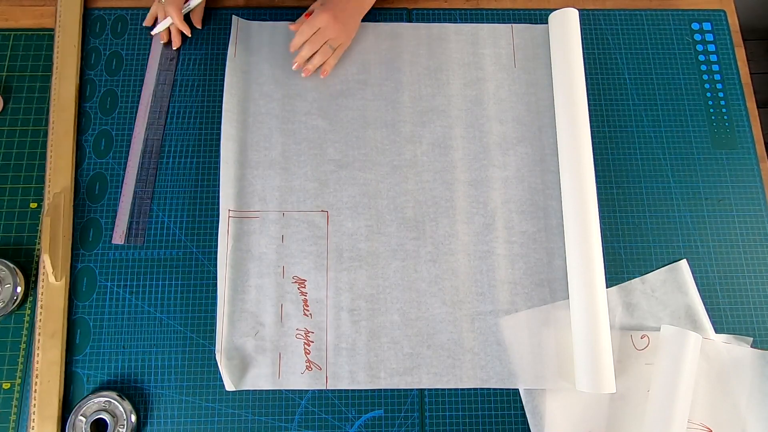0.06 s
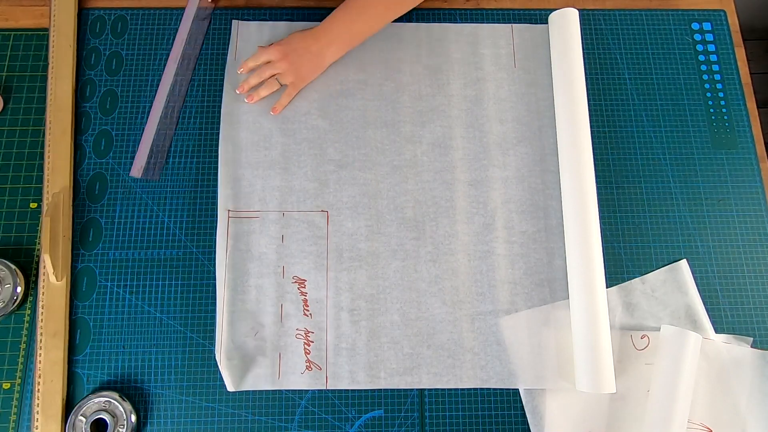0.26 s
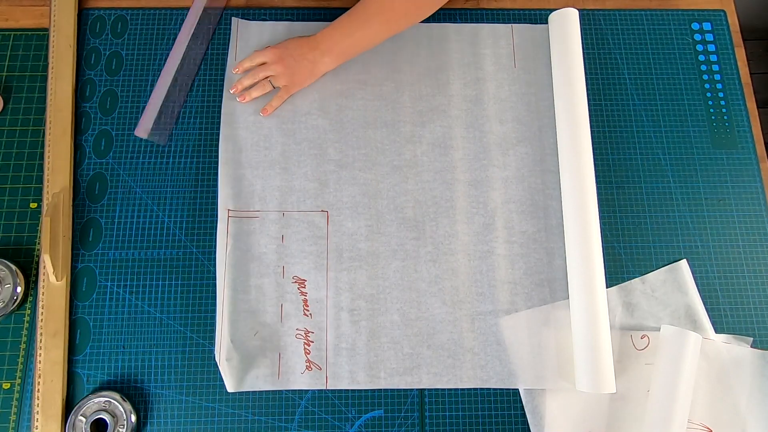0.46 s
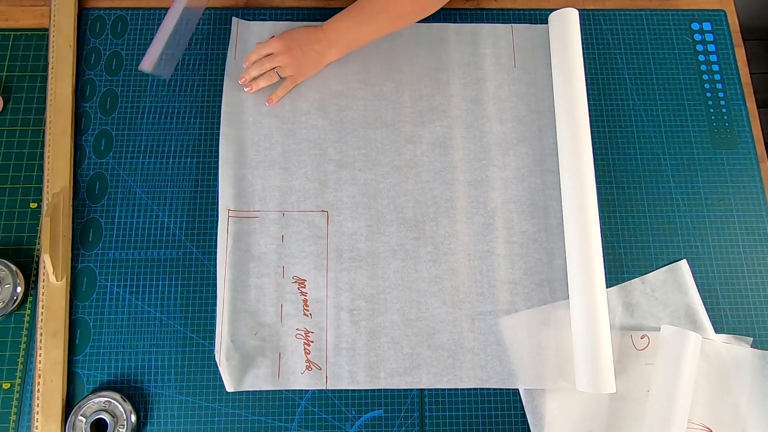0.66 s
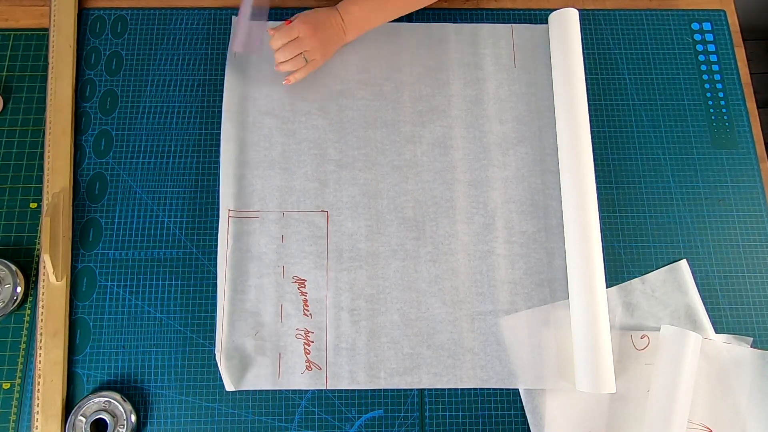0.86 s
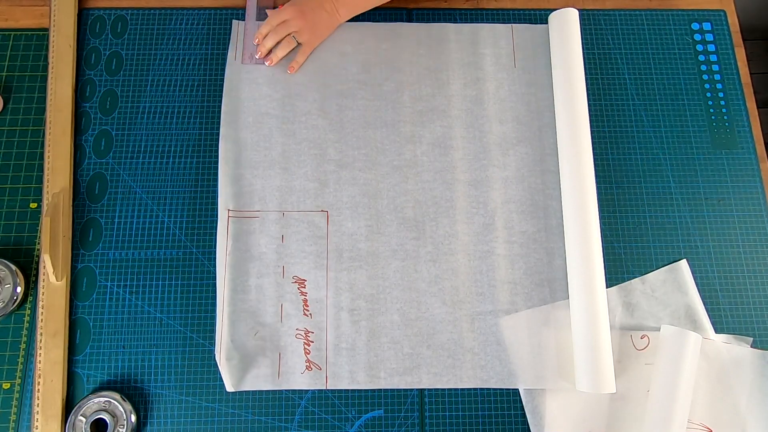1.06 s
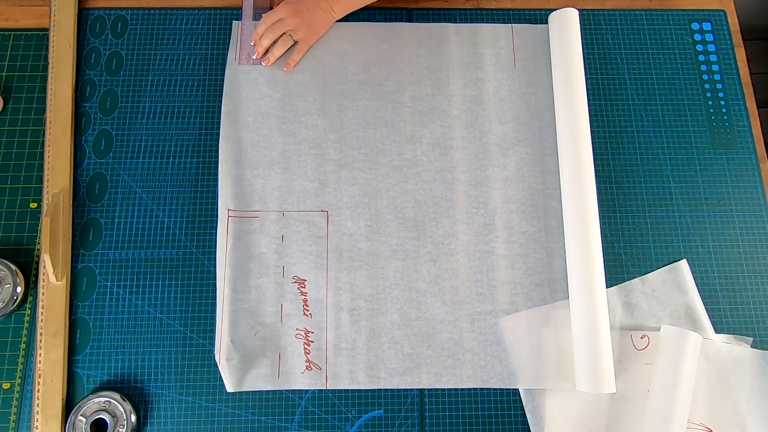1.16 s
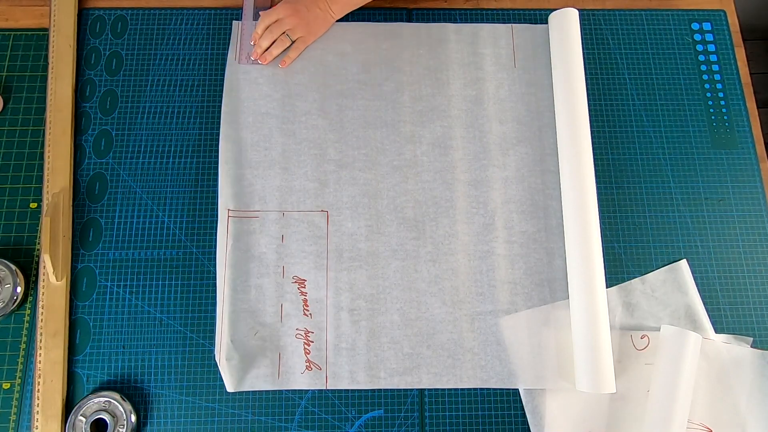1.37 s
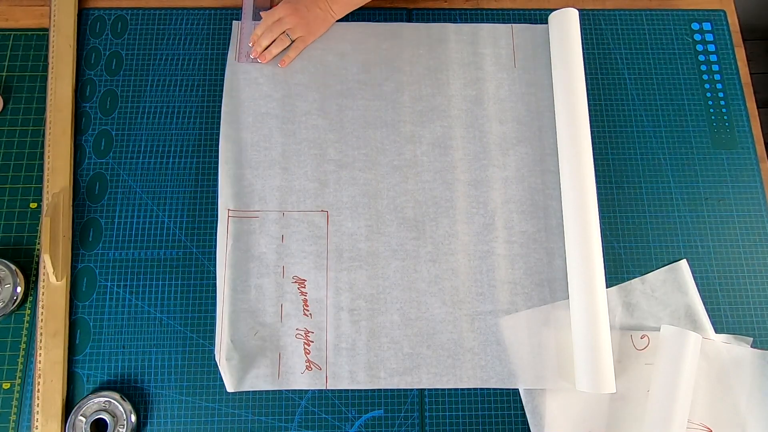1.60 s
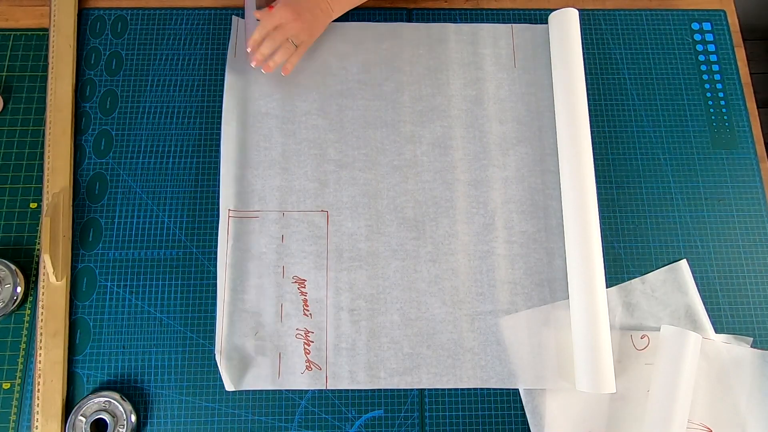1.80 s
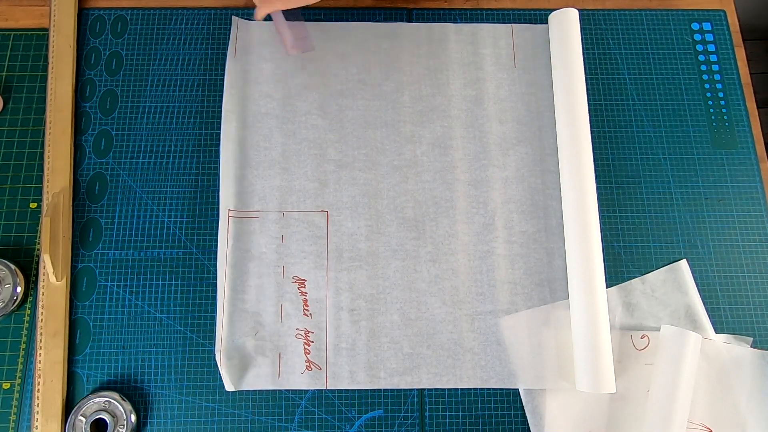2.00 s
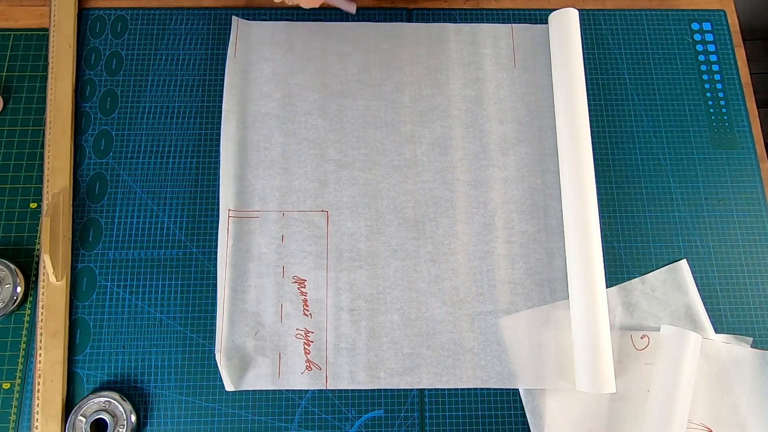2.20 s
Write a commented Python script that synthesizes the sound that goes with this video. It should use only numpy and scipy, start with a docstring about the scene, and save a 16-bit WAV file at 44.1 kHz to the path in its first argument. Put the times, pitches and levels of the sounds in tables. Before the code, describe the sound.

A plastic ruler drags and clacks down on paper over a mat after a hard table knock

```python
"""Ruler and knock at a work table

A hard knock on a work table makes the table top rattle and ring in a small room. A plastic ruler drags
off a cutting mat as grains of friction noise, squeaks, and clicks down on paper with chattering contacts.
Low coloured noise is the knock's dying rumble at first, then hands and sleeves. A quiet room tone, which
is steady coloured noise, lies under it all."""
import sys
import numpy as np
from scipy import signal
from scipy.fft import rfft, irfft
from scipy.io import wavfile

SR = 44100
rng = np.random.default_rng(int(sys.argv[2]) if len(sys.argv) > 2 else 0)


def to_wav(sig):
    """Store sig (one row per channel, or 1-D mono) as 16-bit WAV at the path in sys.argv[1].

    Samples outside -1..1 are clipped; the rate is SR.
    """
    pcm = np.clip(np.atleast_2d(sig), -1, 1) * 32767
    pcm = np.round(pcm).astype(np.int16)
    wavfile.write(sys.argv[1], SR, pcm.T)  # frames by channels


N = 99180


def from_db(db):
    """Turn decibels into a gain."""
    return 10 ** (np.asarray(db) / 20)


def rms_one(x):
    """Scale a signal to an average (RMS) strength of 1."""
    return x / np.sqrt(np.mean(x ** 2) + 1e-20)


def in_time(rows):
    """Join each level column by straight lines in dB, as gains; -120 dB outside the table."""
    times, *columns = np.transpose(rows)
    now = np.arange(N) / SR
    return [from_db(np.interp(now, times, levels, left=-120, right=-120)) for levels in columns]


def at_hz(points, hz, column=1):
    """Read a table column at any frequency, along a logarithmic frequency scale."""
    points = np.array(points)
    return np.interp(np.log(hz), np.log(points[:, 0]), points[:, column])


def colour(x, spectrum):
    """Shape a signal by a table of level over frequency."""
    hz = np.fft.rfftfreq(len(x), 1 / SR) + 1   # +1 avoids the logarithm of zero
    return irfft(rfft(x) * from_db(at_hz(spectrum, hz)), len(x))


def drift(rate_hz):
    """Slow random wandering of RMS 1: noise smoothed twice, made at every 40th sample."""
    r = np.exp(-80 * np.pi * rate_hz / SR)
    noise = rng.standard_normal(N // 40 + 2002)
    slow = signal.lfilter([1], [1, -2 * r, r * r], noise)[2000:]   # skip the filter's start
    return np.interp(np.arange(N) / 40, np.arange(len(slow)), rms_one(slow))


def ring(x, hz, t60):
    """A unit click sets off a sine of starting height 1 that falls 60 dB in t60 seconds."""
    r = from_db(-60 / (t60 * SR))
    w = 2 * np.pi * hz / SR
    return signal.lfilter([0, np.sin(w)], [1, -2 * r * np.cos(w), r * r], x + 1e-18)


def peak(x, hz, width_hz):
    """A resonance that lets its own frequency through with a gain of about 1."""
    r = np.exp(-np.pi * width_hz / SR)
    poles = [1, -2 * r * np.cos(2 * np.pi * hz / SR), r * r]
    return signal.lfilter(np.array([1, 0, -1]) * (1 - r * r) / 2, poles, x)


def add(out, s, piece):
    """Mix a piece in at a time in seconds."""
    i = int(s * SR)
    out[i:i + len(piece)] += piece[:N - i]


def body(clicks, modes, damping):
    """All modes of one object ring together, with alternating signs."""
    out = 0
    for k, (hz, db, t60) in enumerate(modes):
        ring_s = np.clip(t60, .02, .4) * damping
        out = out + from_db(db) * ring(clicks, hz, ring_s) * (-1) ** k
    return out


# Colour of the quiet room: f/Hz, relative level/dB per Hz
ROOM_TONE_COLOUR = [(12, -19.5), (20, 15.5), (32, -18), (113, -2), (222, -11.5), (399, -15.5), (459, -16.5),
                    (976, -17.5), (1660, -27.5), (1910, -26.5), (16000, -32)]
ROOM_TONE_DB = -60


def room_tone():
    """Steady noise, coloured like the quiet room."""
    return from_db(ROOM_TONE_DB) * rms_one(colour(rng.standard_normal(N), ROOM_TONE_COLOUR))


# The knock's dying rumble at first, then hands and sleeves; before the flicker: t/s, level/dB
RUMBLE_AND_RUSTLE_LEVELS = [(0, -28), (.1, -45), (.2, -45.5), (.3, -51.5), (.4, -51), (.46, -47),
                            (.53, -60), (.6, -54.5), (.7, -65.5), (.8, -59), (.95, -61), (1.1, -66.5),
                            (1.3, -69), (1.55, -82), (1.7, -70), (1.78, -59.5), (1.9, -57), (2.0, -62),
                            (2.07, -58.5), (2.12, -62.5), (2.19, -56), (2.25, -72.5)]
# Colour of both: f/Hz, relative level/dB per Hz
RUMBLE_AND_RUSTLE_COLOUR = [(24, -37.5), (40, -12), (60, -2.5), (81, -16.5), (169, -5), (203, -8), (271, 0),
                            (331, -7.5), (727, -9.5), (846, -5.5), (1520, -18.5), (2200, -19),
                            (2860, -25.5), (4840, -120)]


def rumble_and_rustle():
    """Low coloured noise with a flickering level: the knock's dying rumble at first, then hands and sleeves."""
    low_noise = rms_one(colour(rng.standard_normal(N), RUMBLE_AND_RUSTLE_COLOUR))
    flicker = from_db(2.0 * drift(23.2))   # typical swing 2 dB
    return in_time(RUMBLE_AND_RUSTLE_LEVELS)[0] * flicker * low_noise


LOW_TONE_HZ, LOW_TONE_WIDTH_HZ = 2000, 750
GRAINS_PER_S, GRAIN_SPREAD_DB = 10000, 4.5
# Three stretches of dragging over mat and paper, before the flicker:
# t/s, level of the hiss/dB, level of its lower tone/dB
DRAG_LEVELS = [
    [(.17, -64.5, -83), (.25, -44, -56), (.31, -36.5, -59.5), (.36, -39, -40), (.40, -43, -68.5),
     (.46, -46, -65), (.51, -51.5, -61), (.535, -56.5, -87), (.555, -46.5, -60), (.58, -44.5, -47),
     (.60, -62.5, -62), (.635, -54.5, -74.5), (.65, -45.5, -59), (.672, -49, -56), (.69, -61, -64),
     (.75, -63.5, -68), (.775, -56, -64), (.83, -59.5, -68), (.86, -67.5, -77), (.95, -69, -69)],
    [(1.05, -60, -80), (1.14, -43.5, -86), (1.19, -52, -82), (1.27, -65.5, -108), (1.36, -68, -71),
     (1.45, -93, -85.5)],
    [(1.6, -85, -87), (1.63, -73, -98), (1.7, -80, -109), (1.76, -78, -91), (1.78, -66, -88),
     (1.84, -64.5, -68), (1.9, -65.5, -83), (1.96, -72.5, -74), (2.02, -72, -92), (2.1, -72.5, -95.5),
     (2.14, -65, -65), (2.19, -58.5, -72), (2.215, -67, -70), (2.25, -70, -73)],
]
# Colour of the hiss, before its tones are added: f/Hz, relative level/dB per Hz
DRAG_COLOUR = [(880, -41.5), (1500, -14), (2340, -0.5), (2660, 3.5), (3520, 6), (4460, 6.5), (5540, 2.5),
               (8400, 0), (14900, -21), (16000, -35)]
# Broad tones of the ruler: f/Hz, width/Hz, level relative to each other/dB
DRAG_TONES = [(3506, 400, -4), (5590, 170, -6.5), (6880, 550, -12)]


def drag():
    """Dense random grains of friction, coloured by the ruler's broad tones."""
    happens = rng.random(N) < GRAINS_PER_S / SR
    size = from_db(GRAIN_SPREAD_DB * np.minimum(rng.exponential(1, N), 4))
    grains = happens * size * rng.choice([-1, 1], N)
    hiss = rms_one(colour(grains, DRAG_COLOUR))
    tones = sum(from_db(db) * peak(hiss, hz, width_hz) for hz, width_hz, db in DRAG_TONES)
    hiss = rms_one(hiss + 3 * tones)
    low = peak(grains, LOW_TONE_HZ, LOW_TONE_WIDTH_HZ)
    low = rms_one(peak(low, LOW_TONE_HZ, 2 * LOW_TONE_WIDTH_HZ))
    hiss_gain, low_gain = np.sum([in_time(rows) for rows in DRAG_LEVELS], axis=0)
    flicker = from_db(0.92 * drift(44))   # typical swing 0.92 dB
    return flicker * (hiss_gain * hiss + low_gain * low)


SQUEAK_WIDTH_HZ = 120
# The ruler's edge squeaks briefly: t/s, length/s, f/Hz, level before fading in and out/dB
SQUEAKS = [(.568, .022, 2150, -50), (.646, .032, 1940, -44), (.76, .04, 1900, -63), (2.13, .09, 2100, -63)]


def squeaks():
    """Friction noise in one narrow resonance, faded in and out."""
    out = np.zeros(N)
    noises = rng.standard_normal((len(SQUEAKS), 8000))
    for (s, length, hz, db), noise in zip(SQUEAKS, noises):
        tone = rms_one(peak(noise, hz, SQUEAK_WIDTH_HZ))
        tone = tone[2000:2000 + int(length * SR)]   # skip the resonance's start
        add(out, s, from_db(db) * tone * np.hanning(len(tone)) ** 0.52)
    return out


RULER_DB, RULER_DAMPING = -19.5, 0.14   # damping multiplies the ringing times
TAP_CYCLES = 3.1   # cycles in which the contact tone falls 60 dB
THUD_HZ, THUD_S = 950, 0.0031   # starting pitch, fading time
THUMP_HZ, THUMP_S, THUMP_DB = 143.3, 0.0059, -15   # the table top gives under the thud
CRACK_LOW_HZ, CRACK_HIGH_HZ, ECHO_LOW_HZ = 2800, 11100, 159
# The ruler's edge touches down: t/s, level of the contact tone/dB, f/Hz, contact length/s (at least 0.0002),
# then relative to that level: thud in the table/dB, crack/dB, sound sent to the walls/dB
TAPS = [(0.343, -25.5, 5400, 0.0076, -11.5, 3, -4), (0.512, -41, 780, 0.0076, -1, -17, 3),
        (.6340, -23, 7600, 0.00033, -9, -4, -15.5), (0.6369, -30.5, 1950, 0.0036, -7.5, -15, 0),
        (0.9044, -39, 3760, 0.00084, -7, -5, -6), (1.0173, -11.5, 7270, 0.0016, -11.5, -17, -8.5),
        (1.0189, -15.5, 5600, 0.009, -50, -2.5, -1.5), (.780, -46, 4700, .001, -25, -8, -12),
        (1.1006, -21, 3320, .001, -9, -12, -18), (1.1317, -21, 4200, .001, -34, -6, -18),
        (1.1408, -36, 4500, .0004, -30, -6, -18), (1.1433, -31, 6500, .0004, -30, -6, -18),
        (1.1513, -16, 4400, .0011, -26, -4, -18), (1.160, -29, 4800, .0005, -25, -10, -18),
        (1.1623, -29, 8500, .0005, -30, -3, -18), (1.3585, -33, 1050, .001, -9, -22, -18),
        (1.822, -43, 3700, .003, -20, -9, -12), (1.8748, -39, 4200, .0006, -20, -10, -14),
        (1.9382, -38, 4500, .0015, -20, -7, -10), (1.623, -56.5, 3340, 0.0076, -35, -18, -15),
        (2.065, -45, 3500, 0.0011, -0.5, -14, -14), (2.070, -47.5, 950, 0.006, -30, -31, -20),
        (2.131, -50.5, 2000, .002, -23, -4, -14), (2.191, -46.5, 2350, 0.0067, 0.5, -7.5, -8)]
# Ways the ruler rings: f/Hz, relative level/dB, 60 dB ringing time/s (before limits and damping)
RULER_MODES = [(2070, 2, 0.14), (3450, -3, .05), (4360, 2, 0.055), (5100, 17, 0.024), (5950, -14.5, 0.14),
               (6200, 8, .1), (7900, -1.5, .08), (8800, -21, .08), (10170, -37, .06), (12300, -4, .05)]


def taps():
    """Chattering contact rings, cracks, shakes the ruler and thuds; gives direct sound and sound to the walls."""
    direct, shake, far = np.zeros(N), np.zeros(N), np.zeros(N)
    t = np.arange(4000) / SR
    click = 1. * (t == 0)
    chatter = rng.standard_normal((len(TAPS), len(t)))
    # log1p makes the thud's pitch sink
    thud = np.sin(2 * np.pi * THUD_HZ * THUD_S * np.log1p(t / THUD_S)) * np.exp(-t / THUD_S)
    thump_shape = t / THUMP_S * np.exp(1 - t / THUMP_S)
    thud += from_db(THUMP_DB) * np.sin(2 * np.pi * THUMP_HZ * t) * thump_shape
    crack_band = signal.butter(2, [CRACK_LOW_HZ, CRACK_HIGH_HZ], "band", fs=SR, output="sos")
    for (s, db, hz, length, thud_db, crack_db, echo_db), noise in zip(TAPS, chatter):
        contact = np.sign(noise) * np.exp(-(t / max(length, .0002)) ** 3)
        tone = peak(ring(contact, hz, TAP_CYCLES / hz), hz, 0.34 * hz)
        crack = signal.sosfilt(crack_band, contact)
        table_thud = from_db(thud_db) * thud
        tap = tone / abs(tone).max() + from_db(crack_db) * crack / abs(crack).max() + table_thud
        add(direct, s, from_db(db) * tap)
        add(shake, s, from_db(db + RULER_DB) * contact / np.sqrt(np.sum(contact ** 2)))
        to_walls = ring(click, hz, 1.3 / hz) + from_db(crack_db) * 3 * click + table_thud
        add(far, s, from_db(db + echo_db) * to_walls)
    far = signal.lfilter(*signal.butter(2, ECHO_LOW_HZ, "high", fs=SR), far)
    return direct + body(shake, RULER_MODES, RULER_DAMPING), far


TABLE_DB, TABLE_DAMPING, RATTLE_S = -27.5, 1, 0.056   # damping multiplies the ringing times
KNOCK_CRACK_DB, KNOCK_CRACK_S = -9, .0007
KNOCK_ECHO_DB, KNOCK_ECHO_LOW_HZ = -7, 149
# Blows on the table top: t/s, level before the pulse's fading/dB, contact f/Hz
KNOCKS = [(.0038, -7, 3000), (.0056, -4, 2500), (.0074, -3, 900), (.0090, -6, 700), (.0166, -6, 4500),
          (.0192, -8, 800)]
# Ways the table rings: f/Hz, relative level/dB, 60 dB ringing time/s (before limits and damping)
TABLE_MODES = [(161.1, -5, .45), (211.8, 0.5, 0.22), (243.4, -7.5, 0.31), (299, -1.5, 0.24),
               (374.5, -7.5, 0.19), (454, -2.5, 0.2), (524.4, -10.5, 0.49), (600.6, -14, 0.45),
               (736, -28, 0.22), (863, -6, 0.11), (977, 1.5, 0.12), (1066, -19, 0.1)]


def knocks():
    """Short pulses crack, and the table rattles and rings; gives direct sound and sound to the walls."""
    pulses, shake = np.zeros(N), np.zeros(N)
    t = np.arange(6000) / SR
    noises = rng.standard_normal((len(KNOCKS), len(t)))
    for (s, db, hz), noise in zip(KNOCKS, noises):
        pulse = np.sin(2 * np.pi * hz * t) * np.exp(-1.8 * hz * t)
        crack = from_db(KNOCK_CRACK_DB) * noise * np.exp(-t / KNOCK_CRACK_S)
        add(pulses, s, from_db(db) * (pulse + crack))
        rattle = noise * np.exp(-t / RATTLE_S) / np.sqrt(RATTLE_S * SR / 2)
        add(shake, s, from_db(db + TABLE_DB) * rattle)
    far = signal.lfilter(*signal.butter(2, KNOCK_ECHO_LOW_HZ, "high", fs=SR), pulses)
    return pulses + body(shake, TABLE_MODES, TABLE_DAMPING), from_db(KNOCK_ECHO_DB) * far


ROOM_DB, ROOM_DELAY_S = -24, 0.002
# Echo of the small room: f/Hz, time to fall 60 dB/s, relative level/dB
ROOM_ECHO = [(100, 0.88, 1), (300, 0.45, -5), (1000, 0.51, -3), (2800, 0.42, 0.5), (8000, 0.24, 12),
             (15000, 0.067, -14)]


def room(x):
    """Echoes as noise that dies away at its own speed in each half octave."""
    t = np.arange(SR) / SR
    tail = 0
    for low in 60 * 2. ** np.arange(0, 8, .5):
        half_octave = signal.butter(2, [low, low * 2 ** .5], "band", fs=SR, output="sos")
        band = signal.sosfilt(half_octave, rng.standard_normal(SR))
        middle = low * 1.19
        fall_db = 60 * t / at_hz(ROOM_ECHO, middle)
        tail = tail + band * from_db(at_hz(ROOM_ECHO, middle, column=2) - fall_db)
    return from_db(ROOM_DB) * signal.fftconvolve(x, tail * (t > ROOM_DELAY_S))[:N]


# Stereo width: f/Hz, level of the side against the middle/dB
WIDTH = [(60, -18.5), (240, -34.5), (950, -36), (3770, -27.5), (15000, -34.5)]


def widen(mid):
    """A faint copy blurred by short noise is added on the left and subtracted on the right."""
    scramble = rng.standard_normal(1500) * np.exp(-np.arange(1500) / 250)   # in samples
    blurred = signal.fftconvolve(mid, scramble / np.sqrt(np.sum(scramble ** 2)))[:N]
    side = colour(blurred, WIDTH)
    return np.array([mid + side, mid - side])


def scene():
    """All sources together, nearly in the middle; knocks and taps also echo in the room."""
    knock, knock_far = knocks()
    tap, tap_far = taps()
    background = room_tone() + rumble_and_rustle()
    mid = background + drag() + squeaks() + tap + knock + room(knock_far + tap_far)
    return widen(mid)


CUTOFF_HZ = 16900


def record(dry):
    """The top is cut steeply: at least 70 dB down above the cutoff."""
    return signal.sosfilt(signal.cheby2(12, 70, CUTOFF_HZ, fs=SR, output="sos"), dry)


dry = scene()
out = record(dry)
to_wav(out)
```